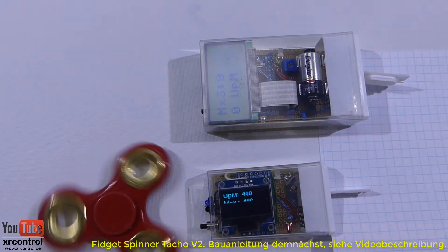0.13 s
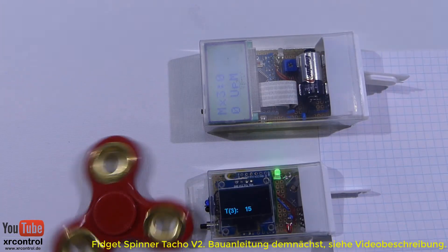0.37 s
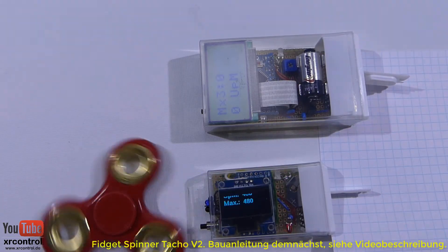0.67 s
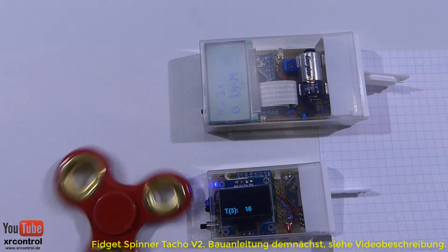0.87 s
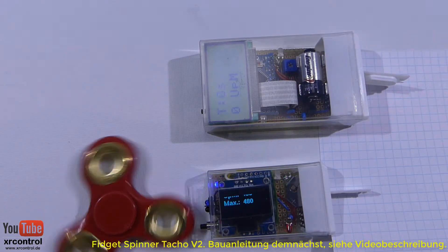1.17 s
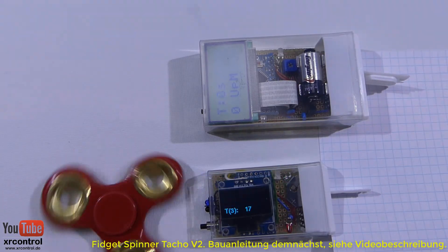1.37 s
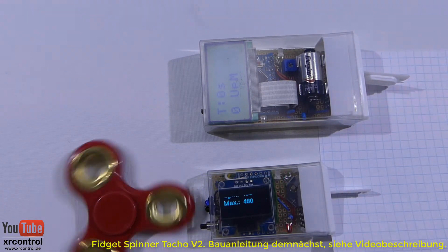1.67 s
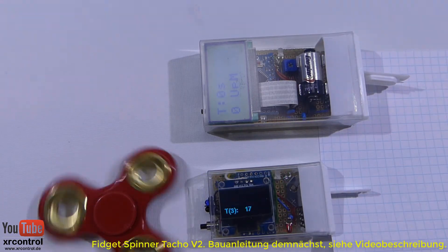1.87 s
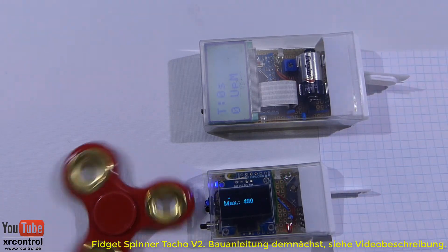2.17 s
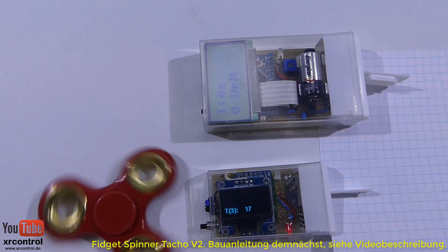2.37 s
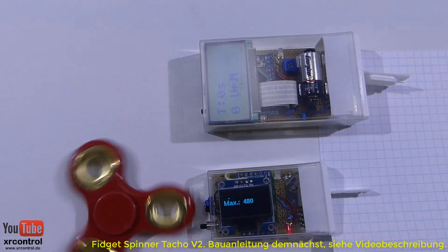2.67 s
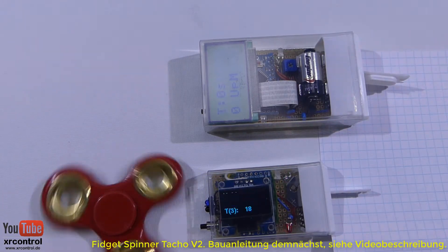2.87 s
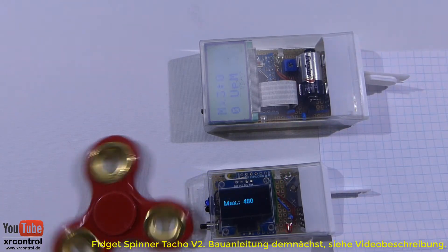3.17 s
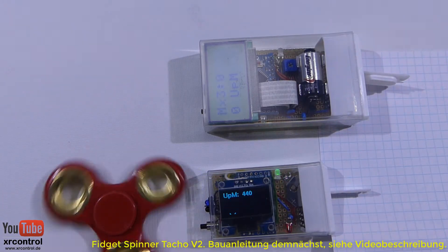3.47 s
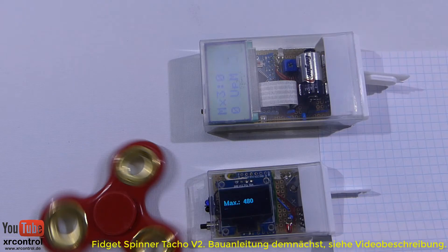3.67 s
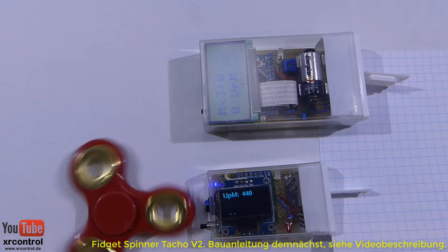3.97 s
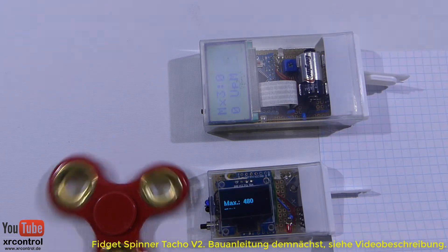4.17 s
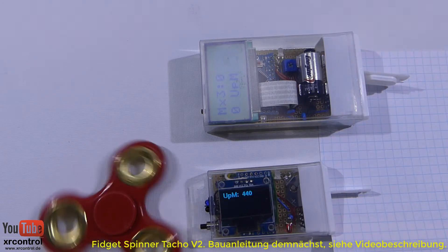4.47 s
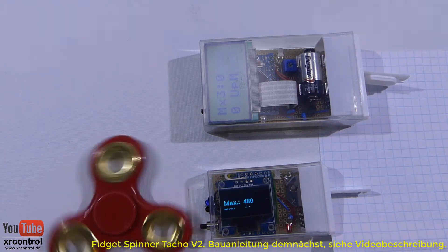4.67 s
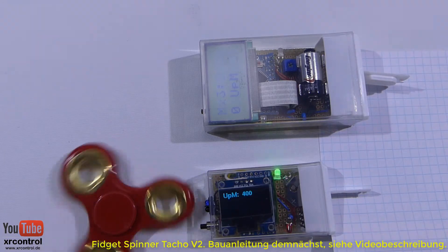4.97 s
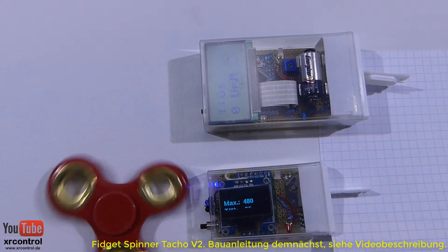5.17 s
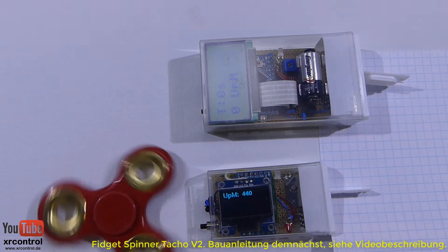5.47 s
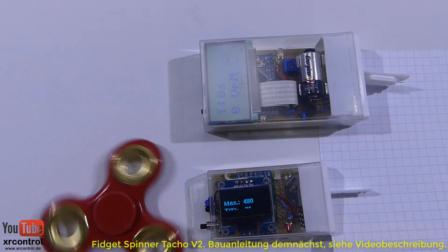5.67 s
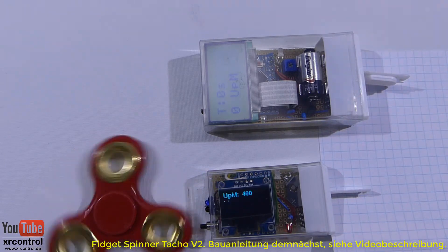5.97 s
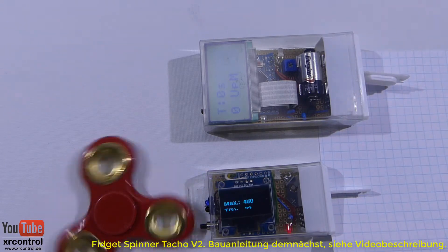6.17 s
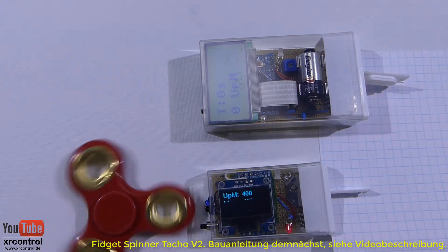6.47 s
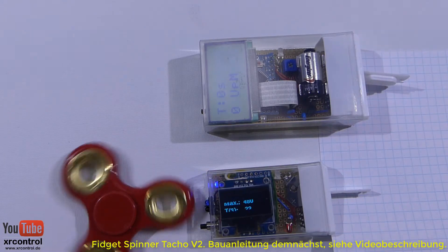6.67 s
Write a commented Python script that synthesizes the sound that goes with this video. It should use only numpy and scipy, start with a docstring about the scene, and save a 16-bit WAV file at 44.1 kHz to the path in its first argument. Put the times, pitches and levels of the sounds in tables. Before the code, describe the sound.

Close up on a desk in a quiet room, a three-armed spinner is already turning and keeps turning. Its bearing gives a thin plastic whirr and fine hiss over a low throbbing hum. The knocks are uneven for the first second, then become a rapid regular flutter, swelling and easing with the wobble. Short swishes come and go while everything slows barely noticeably.

```python
"""A three-armed fidget spinner coasts on a desk indoors for 6.8 s, slowly losing speed.
To about 1 s the cage is loose: balls knock unevenly and ring the desk in a throbbing hum.
Then the knocks come at ball rate, about 20 falling to 18 a second, swelling as the rotor wobbles.
Throughout, balls rolling over pits make the desk drone, the body whirr near 2.7 kHz and the bearing hiss;
the whirr swells into brief swishes on rough patches. A steady noise wash stands for the room."""
import sys
import numpy as np
from scipy import signal
from scipy.fft import rfft, irfft, next_fast_len
from scipy.io import wavfile

SR = 44100
rng = np.random.default_rng(int(sys.argv[2]) if len(sys.argv) > 2 else 0)


def store_wav(level_fs):
    """Save 16-bit WAV to argv[1]."""
    pcm = np.round(np.clip(np.atleast_2d(level_fs), -1, 1) * 32767)
    wavfile.write(sys.argv[1], SR, pcm.T.astype(np.int16))


N = 300965

# coasting rotor: [t/s, speed/(turns/s)]
ROTOR_SPEED = [(0, 7.62), (6.82, 6.763)]
# ball knocks while the cage is loose: [t/s, level/dB]
LOOSE_KNOCKS = [(.071, 9.5), (.132, 9), (.162, 4), (0.251, 4.5), (.313, 1), (0.342, 11.5), (.403, 9),
                (0.435, 3), (.464, 12), (.524, 6), (.646, 8.5), (.675, -1), (0.705, 2), (0.736, 11),
                (.798, 8), (.828, 8), (0.86, 3.5), (0.889, 5), (0.921, 11), (1.012, 6)]
# later balls landing harder or softer: [t/s, level change/dB]
ODD_KNOCKS = [(1.456, 3.5), (1.611, -9), (1.714, -3.5), (1.972, -3.5), (2.076, 3.5), (2.284, 1),
              (2.442, -6), (2.546, 3.5), (3.126, -3), (3.39, -3), (4.086, -7), (4.41, 3), (4.464, 0),
              (4.627, 2.5), (4.954, -10), (5.338, -6), (5.78, 6), (6.113, 7), (6.39, -10), (6.562, 7)]
# wobble load on the bearing:
# [cycles per rotor turn, cycles per cage turn, first peak t/s, hum level swing/dB, drone level swing/dB]
WOBBLE = [(1, -1, 0.033, 3.2, 0.22), (0, 1, 0.34, 1.5, 0.5), (1, 0, 0.093, 1, 0), (2, 0, 0.016, 0.05, 0.75)]
# lowest resonances of the spinner standing on the desk: [f/Hz, width/Hz, level/dB]
HUM_MODES = [(227, 28, -41.5), (261.3, 9.5, -40), (297.7, 10.4, -43.5)]
# higher resonances of the desk top: [f/Hz, width/Hz, level/dB]
DESK_MODES = [(341.4, 16.5, -58), (388.5, 30, -55.5), (433.4, 39, -56.5), (468, 20, -59.5),
              (551.7, 26, -58.5), (566.5, 8.5, -74), (706, 110, -66.5), (777, 110, -63.5), (851, 59, -60),
              (1012, 60, -71.5), (1095, 40, -63), (1197, 71, -61.5), (1246, 60, -69.5), (1382, 73, -65.5),
              (1476.5, 47, -62), (1665.5, 86, -59.5), (1774, 47, -62.5), (1795, 360, -69), (1996, 290, -63),
              (2174, 42, -66)]
# resonances of the plastic body with its weights: [f/Hz, width/Hz, level/dB]
BODY_MODES = [(2284, 64, -61.5), (2386, 88, -54.5), (2461, 39, -52), (2520, 18, -61), (2697, 200, -52.5),
              (2778, 36, -54.5), (2891, 77, -54.5), (2969, 70, -57.5), (3120, 30, -68), (3184, 65, -64),
              (3324, 69, -66.5), (3515, 53, -69.5), (3744, 90, -72)]
# whirr swells on rough patches: [peak t/s, rise and fall time/s, level rise/dB]
SWISHES = [(.445, 0.0095, 4), (.85, 0.045, 3), (1.115, 0.0095, 7), (1.255, 0.028, 4.5), (1.931, 0.03, 6),
           (2.31, 0.016, 3), (2.52, 0.015, 4), (2.735, 0.03, 4), (3.015, 0.023, 7), (3.4, 0.016, 7.5),
           (3.645, 0.013, 4), (4.05, 0.028, 7.5), (4.125, 0.021, 4), (4.52, 0.056, 4), (5.255, 0.04, 4),
           (5.495, 0.022, 3), (5.67, 0.04, 4.5), (5.745, .015, 2), (5.92, .025, 0), (6.07, 0.032, 6.5),
           (6.44, 0.065, 6), (6.55, 0.017, 3)]
# brief changes of the whirr, mostly dips: [t/s, level change/dB]
WHIRR_DIPS = [(1.015, -4), (2.23, -6), (3.89, -10), (4.73, 2), (5.43, -1), (5.61, -6), (6.61, -3)]
# slow swings of the drone: [t/s, level change/dB]
DRONE_LEVEL = [(0, 1.5), (.47, 1.8), (.6, 0.5), (.95, 2), (1.1, 2), (1.4, -1), (1.53, 1.5), (1.68, 0),
               (2.15, 1), (2.95, 0.7), (3.45, 1.4), (3.95, 1.5), (4.55, 0.5), (5.08, 0.7), (5.65, -0.5),
               (6.25, 0.8), (6.82, 0.5)]
# bearing hiss, relative spectral density: [f/Hz, level/dB]
HISS_SPECTRUM = [(2500, -14), (3500, 1.5), (3850, -7), (4050, 1.5), (4350, -3.5), (4800, 1.5), (5800, 0.5),
                 (7200, -3), (7700, -6.5), (9200, -10.5), (9800, -5.5), (10400, -8), (11500, -0.5),
                 (12300, -6), (13000, -8), (15700, -10.5)]
# diffuse room sound, relative spectral density: [f/Hz, level/dB]
ROOM_SPECTRUM = [(25, -37), (80, -20), (165, -3.5), (300, 2), (500, -5), (1000, -9.5), (1500, -11),
                 (1680, -7), (2100, -12), (2550, -6.5), (3700, -21), (5500, -21), (8500, -31), (11700, -20),
                 (13000, -28), (15700, -26)]

BALL_COUNT, CAGE_TURNS_PER_ROTOR_TURN = 7, .3735
SETTLES_AT_S, SETTLED_KNOCK_DB = 1.03, 3.5
DROP_AT_PASS = .672  # share of a ball pass at which it knocks
REBOUND_S, REBOUND_GAIN = .0195, 0.39
ODD_KNOCK_S, WHIRR_DIP_S = .025, 0.015  # time from the peak to 1/e of the dB change
HUM_DB, ROLLING_HUM_DB = -40.5, -50.5  # rung by knocks, by plain rolling
DRONE_DB, WHIRR_DB, HISS_DB = -46.0, -46, -53.5  # base levels at starting speed
HUM_POWER, DRONE_POWER, WHIRR_POWER, HISS_POWER = 0.75, 0.71, 1.66, 1.7  # amplitude ~ speed ** power
ROOM_DB, CUTOFF_HZ = -51, 15650
CONTACTS_PER_TURN, HISS_CONTACTS_PER_TURN = 200, 4000


def hum(clicks, dull_hz=700, soft_hz=900, lowest_hz=178):
    """Knocks and rebounds ring low modes; the broadest, lowest one dies early, so each throb slides up."""
    t_s = np.arange(N) / SR
    rebound = np.interp(t_s - REBOUND_S, t_s, clicks, left=0)
    force = clicks + REBOUND_GAIN * rebound
    modes = HUM_MODES + [mode for mode in DESK_MODES if mode[0] < 900]
    out = np.zeros(N)
    for k, (hz, width_hz, db) in enumerate(modes):
        polarity = 1 if k == 0 else -1  # lowest mode swings against the others
        gain = from_db(db) / np.sqrt(width_hz) / (1 + (hz / dull_hz) ** 2)
        out += polarity * gain * resonate(force, hz, width_hz)
    out = signal.sosfilt(signal.butter(2, soft_hz, fs=SR, output="sos"), out)
    return rms_one(highpass(6, lowest_hz, out))


def knocks(turns, passes, load_db, uneven_db=0.9, jitter_passes=.015, sway_passes=0.0068):
    """Separate knocks while the cage is loose, then one per ball dropping into a worn spot."""
    sway = sway_passes * beat(CAGE_TURNS_PER_ROTOR_TURN * turns, first_peak_s=.169)
    place = passes - DROP_AT_PASS - sway + jitter_passes * drift(6)
    drops = np.diff(np.floor(place), prepend=np.floor(place[0]))
    drops = drops * (np.arange(N) / SR > SETTLES_AT_S)
    level_db = SETTLED_KNOCK_DB + load_db + bumps(ODD_KNOCKS, ODD_KNOCK_S)
    clicks = drops * from_db(level_db + uneven_db * rng.standard_normal(N))
    for t_s, db in LOOSE_KNOCKS:
        clicks[int(t_s * SR)] += from_db(db)
    return clicks


def wobble(turns):
    """Wobble loads the bearing in rotor and cage rhythms: dB for the hum, dB for the drone."""
    hum_db, drone_db = 0, 0
    for per_rotor, per_cage, first_peak_s, hum_swing_db, drone_swing_db in WOBBLE:
        cycles = (per_rotor + per_cage * CAGE_TURNS_PER_ROTOR_TURN) * turns
        swing = beat(cycles, first_peak_s)
        hum_db = hum_db + hum_swing_db * swing
        drone_db = drone_db + drone_swing_db * swing
    return hum_db, drone_db


def whirr(turns, passes, per_s, split_hz=2620, low_share=0.025, cage_db=-0.1, restless_db=1.6):
    """Contacts ring the body, harder under each ball and as the rotor overtakes the cage."""
    force = swell(BALL_COUNT * turns - passes, depth_db=2.0) * swell(passes, depth_db=1.2)
    body = ringing(BODY_MODES, per_s, force)
    upper = highpass_zero_phase(8, split_hz, body)
    surge_db = swishing_db() + bumps(WHIRR_DIPS, WHIRR_DIP_S)
    surge_db = surge_db + cage_db * beat(CAGE_TURNS_PER_ROTOR_TURN * turns, first_peak_s=0.035)
    surge_db = surge_db + restless_db * drift(19)
    surge_db = surge_db - surge_db.mean()
    # surges move the upper modes far more than the lower
    lower = (body - upper) * from_db(low_share * surge_db)
    return lower + upper * from_db(surge_db) + rasp(per_s)


def swishing_db():
    """Rise of the whirr on rough patches, in dB."""
    return sum(bumps([(t_s, db)], width_s) for t_s, width_s, db in SWISHES)


def rasp(per_s, hz=3130, width_hz=420, level_db=-15):
    """On a rough patch the balls also scrape, just above the main body modes."""
    strength = from_db(level_db) * (from_db(swishing_db()) - 1)
    return strength * ringing([(hz, width_hz, 0)], per_s, 1)


def drone(per_s, split_hz=620, lower_db=-5.0):
    """Rolling contacts ring the whole desk top, its lower range held down."""
    desk = ringing(DESK_MODES, per_s, 1)
    upper = highpass_zero_phase(6, split_hz, desk)
    return upper + from_db(lower_db) * (desk - upper)


def hiss(turns, passes, per_s, split_hz=7400, coarse_db=1.0, fine_db=1.4):
    """Dense contacts sizzle, pulsing once a turn and thrice a ball pass; two bands waver apart."""
    pulsing = swell(turns - .36, depth_db=.3) * swell(3 * passes - .41, depth_db=.3)
    sizzle = near_echoes(coloured(contacts(per_s), HISS_SPECTRUM))
    fine = highpass_zero_phase(4, split_hz, sizzle)
    coarse = sizzle - fine
    return pulsing * (from_db(coarse_db * drift(23)) * coarse + from_db(fine_db * drift(39)) * fine)


def near_echoes(x, count=24):
    """Reflections off the desk and things on it comb the treble into fine ridges."""
    lags_s = np.geomspace(.001, .016, count) * rng.uniform(.9, 1.1, count)
    lags = (lags_s * SR).astype(int)
    gains = .085 * rng.choice([-1, 1], count)
    return rms_one(x + sum(gain * np.roll(x, lag) for gain, lag in zip(gains, lags)))


def room(mid_db=-2.0):
    """Steady coloured noise, different on the two sides, as diffuse sound of the room."""
    mid, side = coloured(rng.standard_normal((2, N)), ROOM_SPECTRUM)
    return from_db(ROOM_DB) * (from_db(mid_db) * mid + side * np.array([[1], [-1]]))


def contacts(per_s):
    """Tiny impacts of balls on race pits, random in time and size."""
    hit = rng.random(N) < per_s / SR
    clicks = np.zeros(N)
    clicks[hit] = rng.standard_normal(hit.sum())
    return clicks


def ringing(modes, per_s, force):
    """Each mode rung by its own contacts; rms 1."""
    out = np.zeros(N)
    for hz, width_hz, db in modes:
        rung = resonate(contacts(per_s) * force, hz, width_hz)
        rung = resonate(rung, hz, width_hz)
        out += from_db(db) * rms_one(rung)
    return rms_one(out)


def resonate(x, hz, width_hz):
    """Two-pole resonance, about unit gain at its peak."""
    r = np.exp(-np.pi * width_hz / SR)
    zeros = np.array([1, 0, -1]) * (1 - r * r) / 2
    poles = [1, -2 * r * np.cos(2 * np.pi * hz / SR), r * r]
    return signal.lfilter(zeros, poles, x + 1e-18)


def highpass(order, hz, x):
    """Causal Butterworth high-pass."""
    return signal.sosfilt(signal.butter(order, hz, "high", fs=SR, output="sos"), x)


def highpass_zero_phase(order, hz, x):
    """Zero-phase Butterworth high-pass, so x minus it is the low band."""
    return signal.sosfiltfilt(signal.butter(order, hz, "high", fs=SR, output="sos"), x)


def coloured(x, spectrum):
    """Filter x by (Hz, dB) points; rms 1."""
    hz, db = np.transpose(spectrum)
    size = next_fast_len(N)
    bins_hz = np.maximum(np.fft.rfftfreq(size, 1 / SR), 1)
    gain = from_db(np.interp(np.log(bins_hz), np.log(hz), db))
    return rms_one(irfft(rfft(x, size) * gain, size)[..., :N])


def swell(cycles, depth_db):
    """Gain peaking once a cycle."""
    return from_db(depth_db * np.cos(2 * np.pi * cycles))


def beat(cycles, first_peak_s):
    """Cosine of -1 to 1, once a cycle, peaking at first_peak_s."""
    peak_cycles = np.interp(first_peak_s * SR, np.arange(N), cycles)
    return np.cos(2 * np.pi * (cycles - peak_cycles))


def bumps(rows, width_s):
    """Brief smooth rises or dips, in dB."""
    t_s = np.arange(N) / SR
    return sum(db * np.exp(-((t_s - peak_s) / width_s) ** 2) for peak_s, db in rows)


def drift(rate_hz):
    """Slow random wander, rms 1, computed at every 40th sample."""
    r = np.exp(-80 * np.pi * rate_hz / SR)
    noise = rng.standard_normal(N // 40 + 2002)
    slow = signal.lfilter([1], [1, -2 * r, r * r], noise)[2000:]  # drop the filter's start
    return np.interp(np.arange(N) / 40, np.arange(len(slow)), rms_one(slow))


def in_time(rows):
    """Second column of a curve, at every sample."""
    t_s, values = np.transpose(rows)
    return np.interp(np.arange(N) / SR, t_s, values)


def from_db(db):
    """Decibels to gain."""
    return 10 ** (np.asarray(db) / 20)


def rms_one(x):
    """Scale to unit power."""
    return x / np.sqrt(np.mean(x ** 2) + 1e-20)


def placed(x, left_db):
    """Pan by a left-minus-right level difference."""
    return x * from_db(left_db * np.array([[.5], [-.5]]))


def scene():
    """Spin rate sets the source levels, contact rates and throbs."""
    speed = in_time(ROTOR_SPEED)
    turns = np.cumsum(speed) / SR
    passes = BALL_COUNT * CAGE_TURNS_PER_ROTOR_TURN * turns
    speed_db = 20 * np.log10(speed / speed[0])
    contacts_per_s = CONTACTS_PER_TURN * speed
    hum_load_db, drone_load_db = wobble(turns)

    knocking = knocks(turns, passes, hum_load_db + HUM_POWER * speed_db)
    low = from_db(HUM_DB) * hum(knocking)
    low = low + from_db(ROLLING_HUM_DB) * ringing(HUM_MODES, contacts_per_s, 1)
    body = from_db(WHIRR_DB + WHIRR_POWER * speed_db) * whirr(turns, passes, contacts_per_s)
    desk_db = DRONE_DB + DRONE_POWER * speed_db + drone_load_db + in_time(DRONE_LEVEL)
    desk = from_db(desk_db) * drone(contacts_per_s)
    sizzle = hiss(turns, passes, HISS_CONTACTS_PER_TURN * speed)
    sizzle = from_db(HISS_DB + HISS_POWER * speed_db) * sizzle

    spinner = placed(low, left_db=-0.4) + placed(body, left_db=-1.0)
    return spinner + placed(desk, left_db=0.5) + placed(sizzle, left_db=0.5) + room()


def record(dry):
    """Steep elliptic low-pass at CUTOFF_HZ."""
    return signal.sosfilt(signal.ellip(12, .1, 80, CUTOFF_HZ, fs=SR, output="sos"), dry)


dry = scene()
out = record(dry)
store_wav(out)
```